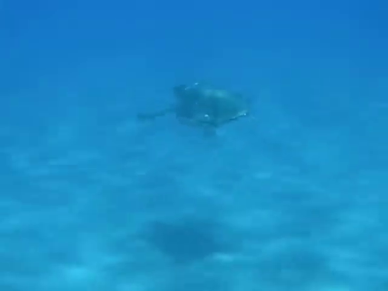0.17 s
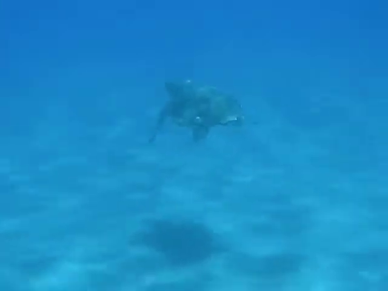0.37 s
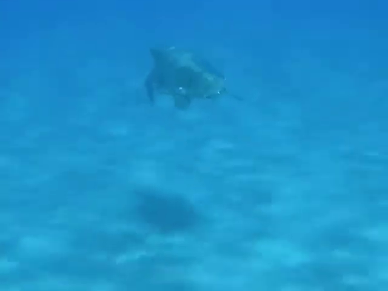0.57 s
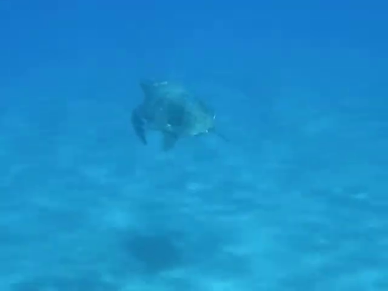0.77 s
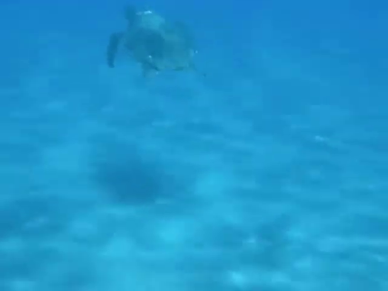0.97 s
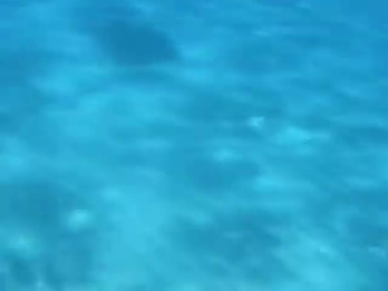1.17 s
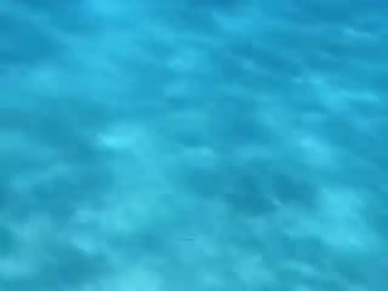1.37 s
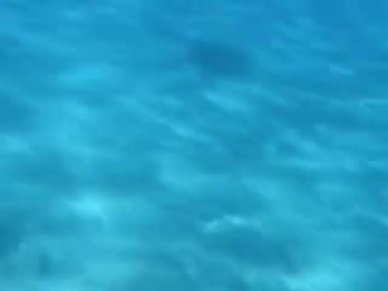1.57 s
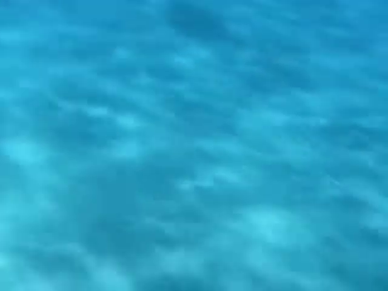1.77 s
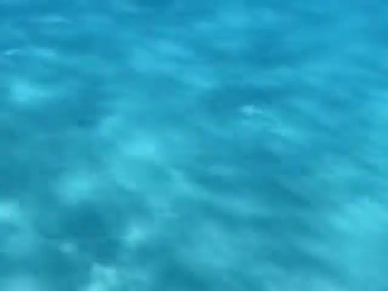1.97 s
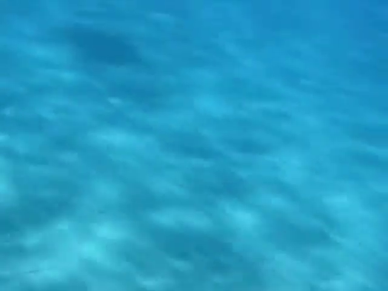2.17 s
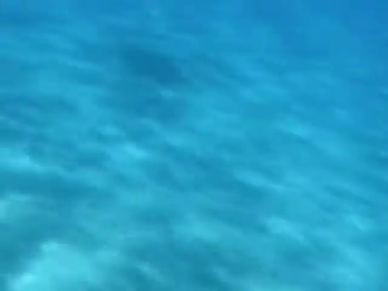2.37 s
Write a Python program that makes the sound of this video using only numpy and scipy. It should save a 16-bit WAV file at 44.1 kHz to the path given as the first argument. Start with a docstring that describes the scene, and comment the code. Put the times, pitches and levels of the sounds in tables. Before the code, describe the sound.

Underwater, a low churn and hollow hiss of passing sea water, heard from inside a sealed camera case. Dull knocks and brief sloshes of bubbles give way to deep, loud glugs right beside the microphone, followed by smaller ones.

```python
"""A low churn and a muffled, hollow hiss: sea water streaming past a microphone in a moving, sealed case.
Soft bumps ring the case, sloshes of bubbles sweep by and slap it, and air pockets glug right beside it,
each ringing briefly, most with a gliding pitch. Everything is heard through the case wall, which shuts
out the high treble. The biggest glugs overload the recorder and duck its gain."""
import sys
import numpy as np
from scipy import signal
from scipy.fft import rfft, irfft
from scipy.io import wavfile
from scipy.ndimage import uniform_filter1d

SR = 44100
rng = np.random.default_rng(int(sys.argv[2]) if len(sys.argv) > 2 else 0)


def master_out(mix):
    """Clip the mix to full scale and print it as 16-bit PCM to the path in sys.argv[1]."""
    frames = np.transpose(np.atleast_2d(mix))
    ceiling = np.clip(frames, -1, 1)
    pcm = np.round(ceiling * 32767).astype(np.int16)
    wavfile.write(sys.argv[1], SR, pcm)


N = 106589
T = np.arange(N) / SR
LARGE_BUBBLE_RISE_S, SMALL_BUBBLE_RISE_S = 0.0042, 0.0021


def amp(db):
    """Decibels to gain."""
    return 10 ** (np.asarray(db) / 20)


def unit(x):
    """Scales to rms 1."""
    return x / np.sqrt(np.mean(x ** 2) + 1e-20)


def level(table, column):
    """Gain over time from one dB column of a table."""
    rows = np.array(table)
    return amp(np.interp(T, rows[:, 0], rows[:, column]))


def colour(x, spectrum):
    """Filters by a spectrum of (f/Hz, level/dB) points; rms 1."""
    hz, db = np.transpose(spectrum)
    f = np.fft.rfftfreq(2 * N, 1 / SR)
    gain = amp(np.interp(np.log(f + 1), np.log(hz), db, right=-140))
    return unit(irfft(rfft(x, 2 * N) * gain)[:N])


def add(mix, s, sound):
    """Mixes a sound in at time s."""
    part = mix[max(round(s * SR), 0):][:len(sound)]
    part += sound[:len(part)]


def impulses(per_s):
    """Clicks of either sign at random times."""
    return (rng.random(N) < per_s / SR) * rng.choice([-1, 1], N)


def eddies(patchy_db, flicker_db):
    """Noise whose level drifts in patches of time and frequency, and flickers as a whole."""
    frames = N // 256 + 5
    re, im, patch = rng.standard_normal((3, frames, 513))
    patch = unit(uniform_filter1d(uniform_filter1d(patch, size=16, axis=0), size=4, axis=1))
    flicker = unit(uniform_filter1d(rng.standard_normal(frames), size=4))[:, None]
    spectra = (re + 1j * im) * amp(patchy_db * patch + flicker_db * flicker)
    return signal.istft(spectra.T, nperseg=1024, noverlap=768)[1][:N]


def ring(hz, t60, rise_s, glide=0, hold=0):
    """A damped oscillation with a soft start, a brief hold and a glide in octaves per second."""
    t = np.arange(SR // 2) / SR
    start = np.sin(np.pi / 2 * np.minimum(t / rise_s, 1)) ** 2
    fade = amp(-60 * np.maximum(t - rise_s - hold, 0) / t60)
    return start * fade * np.sin(2 * np.pi * np.cumsum(hz * 2 ** (glide * t)) / SR)


# the flow around the case, for churn and stream (t/s, then relative level/dB: churn, hiss, fizz, treble)
FLOW_LEVELS = [(0, -27, -37, -51, -45.5), (.17, -30, -31, -41.5, -42.5), (.3, -24, -35.5, -43, -43.5),
               (.42, -23.5, -37, -41, -48), (.62, -24, -32.5, -40.5, -44), (.85, -22.5, -31, -42.5, -43.5),
               (1.2, -23.5, -31, -41, -40.5), (1.42, -24.5, -27, -39.5, -48.5),
               (1.57, -22, -27.5, -40.5, -45), (1.65, -11, -27.5, -37, -47.5),
               (1.8, -16.5, -32.5, -42, -49), (2.0, -20, -32.5, -37.5, -51.5),
               (2.13, -17.5, -27, -35, -47.5), (2.3, -17.5, -31.5, -44.5, -52.5),
               (2.41, -18, -33, -46, -43)]
# turbulence as heard from inside the case (f/Hz, level/dB)
CHURN_SPECTRUM = [(60, -40), (170, -13.5), (222, 2), (290, -3), (385, -8), (450, -9), (570, -14.5),
                  (700, -19.5), (950, -20.5), (1500, -28.5), (4000, -97)]


def churn():
    """All around the case: low turbulence and a crowd of overlapping, slightly rising bubble notes."""
    gurgle = np.zeros(N)
    pitches = np.geomspace(225.3, 422, 12)
    for hz in pitches:
        births = impulses(per_s=220 / len(pitches))
        note = ring(hz, t60=0.17, rise_s=LARGE_BUBBLE_RISE_S, glide=rng.uniform(0, 1))
        gurgle += signal.oaconvolve(births, note)[:N] / hz
    wash = colour(eddies(patchy_db=1, flicker_db=-1.6), CHURN_SPECTRUM)
    return level(FLOW_LEVELS, column=1) * (amp(1) * wash + amp(-2) * unit(gurgle))


# buffeting on the case wall (t/s, level/dB)
RUMBLE_LEVELS = [(0, -32.5), (.35, -32), (.55, -35), (.8, -29), (.97, -32), (1.14, -29.5), (1.4, -25.5),
                 (1.54, -25), (1.63, -17), (1.85, -21), (2.15, -36.5), (2.41, -27)]
# four bands of the stream as they reach the microphone (f/Hz, level/dB)
RUMBLE_SPECTRUM = [(8, -16), (25, 3.5), (60, -2.5), (120, -3), (170, -3), (300, -36.5), (800, -71.5)]
HISS_SPECTRUM = [(300, -19.5), (700, -8), (980, -11.5), (1170, 3.5), (1330, 1), (1480, -10), (1720, -1.5),
                 (1890, -2.5), (2010, -3.5), (2180, -22.5), (3000, -41.5), (4400, -69.5)]
FIZZ_SPECTRUM = [(1500, -32.5), (2150, -9), (2390, 2.5), (2510, -2), (2620, -2.5), (2850, -6), (3120, 1.5),
                 (3270, -10.5), (3900, -30), (4400, -61.5)]
TREBLE_SPECTRUM = [(1500, -46), (2400, -12), (3000, -8), (3330, -14), (3520, 2.5), (3700, 1.5),
                   (3930, -18.5), (4200, -13.5), (4450, -36.5), (6000, -76.5)]


def stream():
    """Along the wall: buffeting rumble and the hiss and fizz of passing water, coloured by the case."""
    rumble = colour(eddies(patchy_db=1.5, flicker_db=0), RUMBLE_SPECTRUM)
    hiss = amp(1) * colour(eddies(patchy_db=1, flicker_db=2.2), HISS_SPECTRUM)
    fizz = colour(eddies(patchy_db=1.5, flicker_db=0.24), FIZZ_SPECTRUM)
    treble = amp(-1.5) * colour(eddies(patchy_db=-2, flicker_db=1.3), TREBLE_SPECTRUM)
    return (level(RUMBLE_LEVELS, column=1) * rumble + level(FLOW_LEVELS, column=2) * hiss
            + level(FLOW_LEVELS, column=3) * fizz + level(FLOW_LEVELS, column=4) * treble)


# soft bumps on the case (t/s, relative level/dB)
CASE_KNOCKS = [(0.2059, -9), (0.2225, -8), (0.2359, -11.5), (0.251, -9)]
# modes of the case around the microphone (f/Hz, level/dB, t60/s)
CASE_MODES = [(135.5, -9.5, 0.074), (209, 3, 0.055), (275, -6.5, 0.044), (457, -8, .03)]
# slow pushes of water on the case (t/s, f/Hz, level/dB, t60/s)
WATER_PUSHES = [(.262, 33, -17.5, 0.25), (0.673, 71, -14.5, 0.21), (1.583, 112.4, -6, 0.06)]


def bumps():
    """On the case itself: dull knocks ring its modes, and slow pushes of water rock it."""
    out = np.zeros(N)
    knock = sum(amp(db) * ring(hz, t60, rise_s=0.0018) for hz, db, t60 in CASE_MODES)
    for s, db in CASE_KNOCKS:
        add(out, s, -amp(db) * knock)
    for s, hz, db, t60 in WATER_PUSHES:
        add(out, s, amp(db) * ring(hz, t60, rise_s=0.0083))
    return out


# clouds of bursting bubbles passing the microphone (crest t/s, rise/s, fall/s, level/dB)
BUBBLE_CLOUDS = [(0.345, 0.011, 0.0096, -20.5), (0.772, 0.077, 0.056, -17.5), (0.827, 0.015, 0.056, -16),
                 (1.306, 0.034, 0.025, -17), (1.332, 0.00204, 0.029, -16), (1.368, .003, 0.014, -11),
                 (1.384, 0.012, 0.012, -15.5), (1.419, 0.0037, 0.025, -14), (1.446, 0.0098, 0.011, -16.5),
                 (1.707, 0.0035, 0.005, -6.5), (2.189, 0.036, 0.022, -23), (2.255, 0.0017, 0.026, -18),
                 (2.406, 0.055, 0.039, -26.5)]
# their froth, heard through the wall (f/Hz, level/dB)
FROTH_SPECTRUM = [(40, -19), (150, 4), (230, 0), (380, 0.5), (620, -2.5), (900, -2), (1280, -11.5),
                  (1480, -18.5), (1900, -21.5), (2200, -46.5), (3300, -27), (4400, -63.5)]


def sloshes():
    """Sweeping close by: dense pops and short rising bubble notes over a wash, swelling and dying."""
    power = np.zeros(N)
    for s, rise, fall, db in BUBBLE_CLOUDS:
        from_crest = np.where(T < s, (s - T) / rise, (T - s) / fall)
        power += amp(2 * db) * np.exp(-2 * from_crest)
    pops = impulses(per_s=970) * amp(-1.5 * np.minimum(rng.exponential(1, N), 2))
    wash = amp(-2.5) * rng.standard_normal(N)
    froth = colour(unit(pops) + wash, FROTH_SPECTRUM)
    notes = np.zeros(N)
    pitches = np.geomspace(384, 1427, 20)
    for hz in pitches:
        births = impulses(per_s=420 / len(pitches))
        note = ring(hz, t60=16 / hz, rise_s=SMALL_BUBBLE_RISE_S, glide=rng.uniform(0, 9))
        notes += signal.oaconvolve(births, note)[:N]
    return np.sqrt(power) * unit(froth + amp(-6) * unit(notes))


# sharp slaps of water on the wall (t/s, peak level/dB, f/Hz)
WATER_SLAPS = [(.341, -7.5, 640), (.769, -16, 620), (.838, -21, 810), (1.329, -10, 603), (1.381, -13, 757),
               (1.4141, -6, 678), (1.7062, -6.5, 930)]
# the short ring of one slap (multiple of its pitch, relative level/dB, t60/s)
SLAP_MODES = [(.38, 2.5, 0.04), (.68, 3.5, 0.025), (1, 2, .018), (1.45, -6.5, 0.02), (1.85, -5.5, 0.03)]


def slaps():
    """Against the case: water slaps near the crest of a slosh, each time at its own pitch."""
    out = np.zeros(N)
    for s, db, hz in WATER_SLAPS:
        slap = sum((-1) ** k * amp(mode_db) * ring(hz * ratio, t60, rise_s=0.003)
                   for k, (ratio, mode_db, t60) in enumerate(SLAP_MODES))
        add(out, s, amp(db) * slap / abs(slap).max())
    return out


# small single bubbles (t/s, f/Hz, level/dB, t60/s)
SMALL_BUBBLES = [(.161, 1934, -22.5, 0.061), (.84, 1900, -17.5, 0.012), (.84, 2510, -19, 0.0095),
                 (0.914, 2450, -22, 0.02), (.956, 2280, -28, .025), (1.3586, 1820, -17, 0.016),
                 (1.3797, 1803, -16.5, 0.047), (1.4107, 1920, -14.5, 0.024)]
# large air pockets at close range (t/s, f/Hz, level/dB, hold/s, t60/s, glide/octaves per s)
AIR_POCKETS = [(0.237, 478, -15.5, 0.0028, 0.044, -5), (0.324, 488.3, -17.5, 0.0158, 0.029, 9),
               (0.338, 320, -8.5, 0.0032, 0.089, -1.5), (0.765, 380.5, -11, 0.007, 0.094, 5),
               (0.816, 360, -10, 0.0036, 0.053, -3), (1.375, 308, -13.5, 0.0074, 0.026, -1),
               (1.444, 490, -13.5, 0.00086, 0.013, 9.5), (1.488, 302, -10.5, 0.016, 0.013, 9),
               (1.521, 287, -13, 0.028, 0.26, 2), (1.5863, 245.5, 8, 0.0073, 0.039, -6),
               (1.693, 425, -3.5, 0.0021, 0.028, -16), (1.705, 302, 6, 0.0023, 0.012, -12.5),
               (1.7165, 300, 3.5, 0.001, .012, 1.5), (1.711, 222.2, 1.5, 0.0097, 0.37, 0.75),
               (1.791, 766, -12, 0.0021, 0.022, 16), (1.824, 384.4, -3.5, 0.009, 0.026, 5.5),
               (1.848, 338, -4, 0.0037, 0.033, 3), (1.844, 804, -17.5, 0.01, .04, 2),
               (1.939, 421, -9, 0.004, 0.067, 3), (2.163, 323, -12, 0.0045, 0.11, 0),
               (2.17, 497, -16, 0.022, 0.11, 1), (2.205, 411, 2, 0.0026, 0.094, 0),
               (2.251, 394.7, -9, 0.0069, 0.17, 1), (2.252, 560, -11.5, 0.0038, 0.12, -0.5),
               (2.275, 327, -9, 0.0059, 0.029, -17)]


def bubbles():
    """Right beside the microphone: single bubbles ring; large ones glug, small ones tick."""
    out = np.zeros(N)
    for s, hz, db, hold, t60, glide in AIR_POCKETS:
        add(out, s, amp(db) * ring(hz, t60, LARGE_BUBBLE_RISE_S, glide, hold))
    for s, hz, db, t60 in SMALL_BUBBLES:
        add(out, s, amp(db) * ring(hz, t60, SMALL_BUBBLE_RISE_S))
    return out


def scene():
    """The sea at one microphone inside the case, whose wall passes nothing above the low treble."""
    water = churn() + stream() + bumps() + sloshes() + slaps() + bubbles()
    case_wall = signal.firwin(301, 4400, window=("kaiser", 9), fs=SR)
    return signal.oaconvolve(water, case_wall, "same")[None]


DUCK_ABOVE_DB, DUCK_SHARE, DUCK_ATTACK_S, RECOVER_DB_PER_S = 0.5, 0.88, 0.009, 30.5
CEILING, KNEE = 0.71, 30
ROLL_OFF_HZ, BAND_EDGE_HZ = 11500, 15800


def record(dry):
    """The recorder ducks just after each loud glug, too late to stop the overload; treble rolls off."""
    over_db = np.maximum(20 * np.log10(abs(dry[0]) + 1e-9) - DUCK_ABOVE_DB, 0)
    # each peak sets a cut in gain that then shrinks at a steady rate
    recovery_db = RECOVER_DB_PER_S * T
    cut_db = np.maximum.accumulate(DUCK_SHARE * over_db + recovery_db) - recovery_db
    lag = np.exp(-1 / (DUCK_ATTACK_S * SR))
    ducked = dry * amp(-signal.lfilter([1 - lag], [1, -lag], cut_db))
    clipped = ducked / (1 + abs(ducked / CEILING) ** KNEE) ** (1 / KNEE)
    pole = np.exp(-2 * np.pi * ROLL_OFF_HZ / SR)
    dull = signal.lfilter([1 - pole], [1, -pole], clipped)
    band_limit = signal.firwin(255, BAND_EDGE_HZ, window=("kaiser", 9), fs=SR)
    return signal.oaconvolve(dull, band_limit[None], "same")


dry = scene()
out = record(dry)
master_out(out)
```